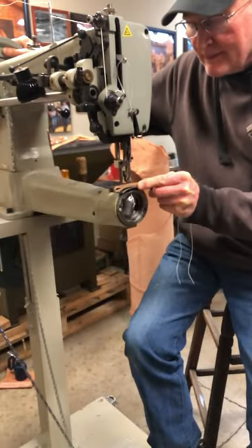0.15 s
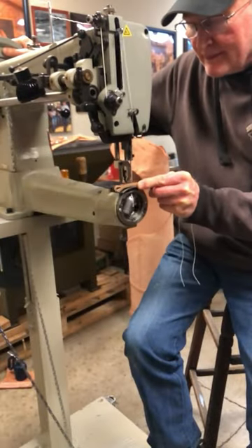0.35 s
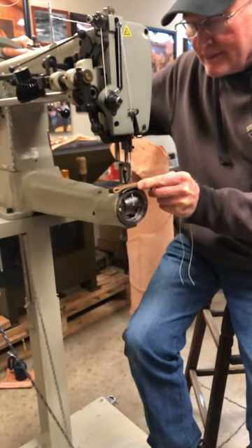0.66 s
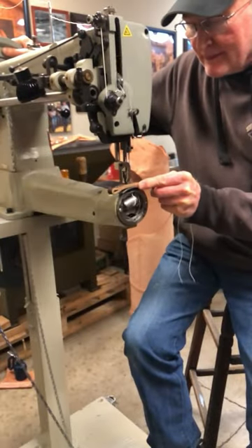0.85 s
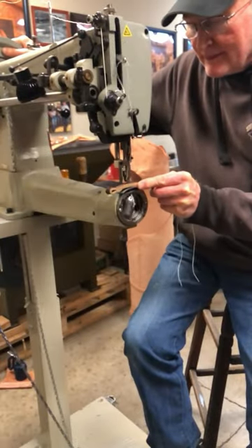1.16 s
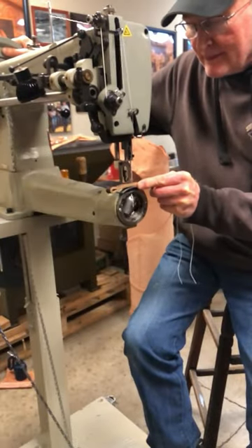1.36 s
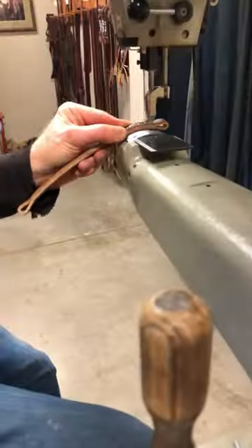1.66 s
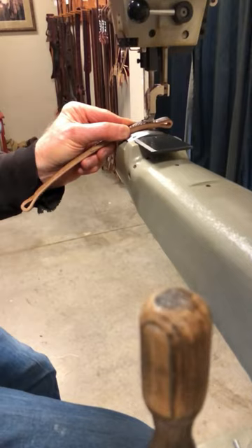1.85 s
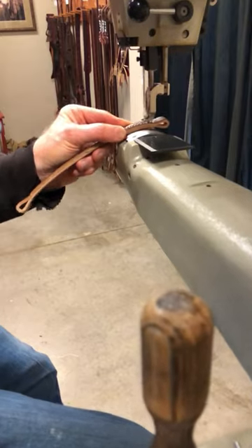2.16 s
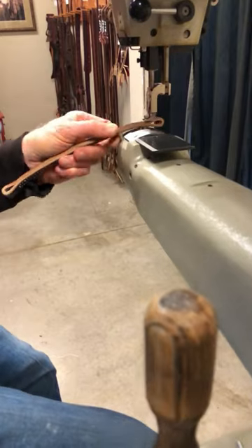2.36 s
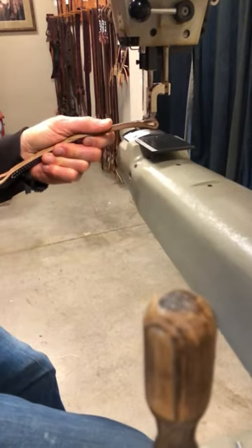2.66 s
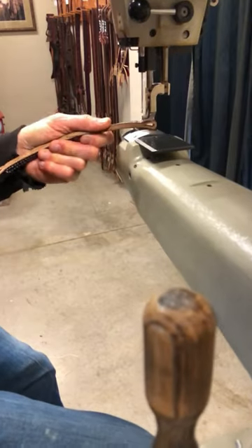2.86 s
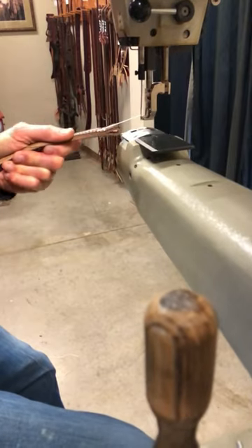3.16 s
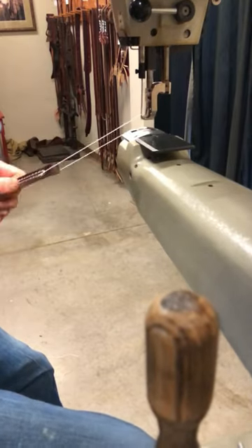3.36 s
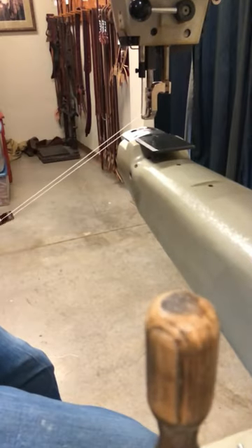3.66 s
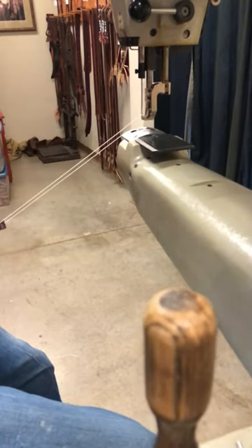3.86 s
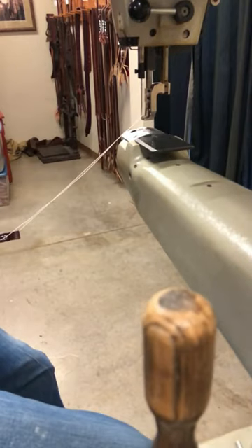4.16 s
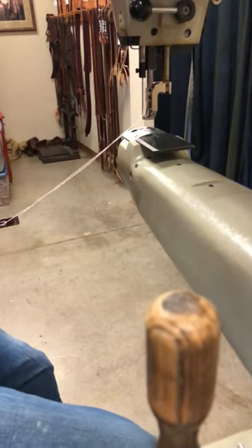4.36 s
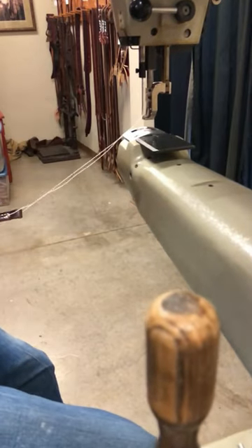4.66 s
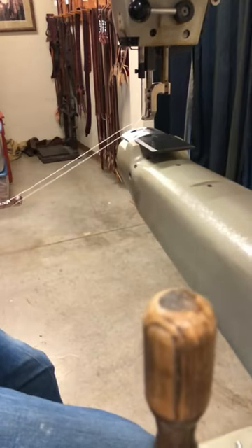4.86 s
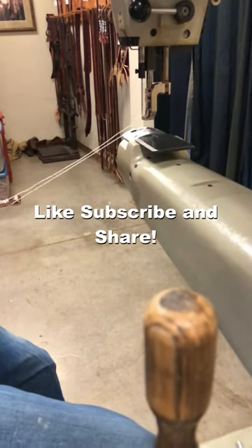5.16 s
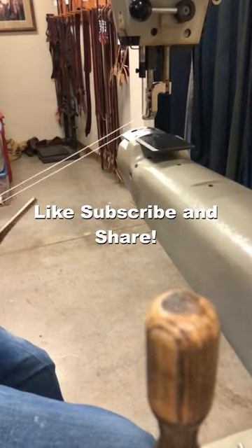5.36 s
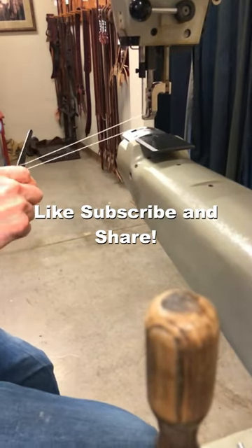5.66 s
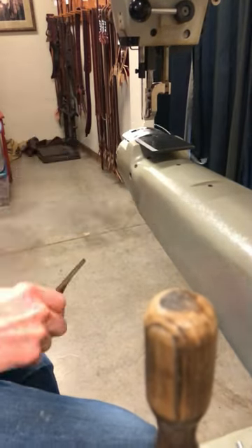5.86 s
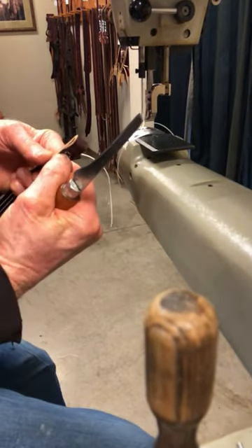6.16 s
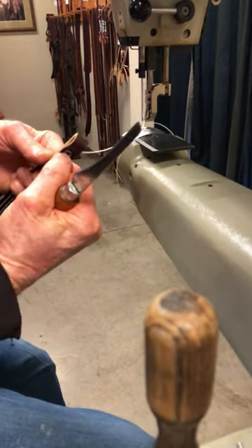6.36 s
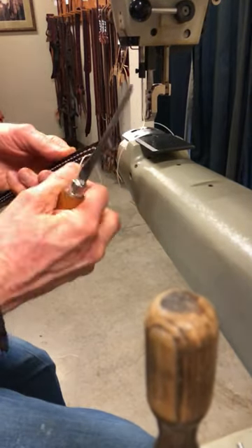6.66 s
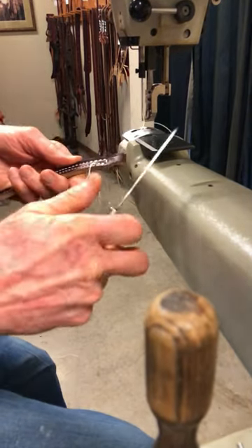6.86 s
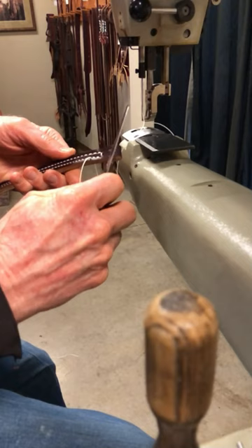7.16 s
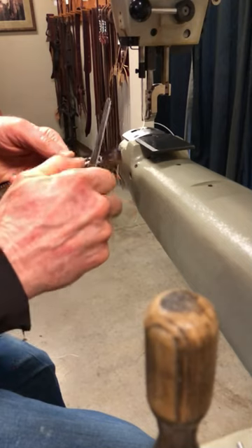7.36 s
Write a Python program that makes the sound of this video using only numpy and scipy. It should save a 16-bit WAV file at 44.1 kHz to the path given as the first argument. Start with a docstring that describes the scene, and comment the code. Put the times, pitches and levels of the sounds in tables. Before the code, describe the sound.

Rapid mechanical clacking and a wavering gear whine cut off abruptly, followed by lever clanks, thread rasp and small knife and leather noises.

```python
"""In a workshop a heavy sewing machine stitches leather three times a second, then stops.
Gear partials whine as load slows them, noise shaped by the frame rumbles, and bursts at each contact clack.
The presser foot is lifted on ringing modes; the work is drawn out, threads rasping by stick and slip in their guides.
Then hands, leather, a knife and a sliding tool knock, squeak and rustle as struck modes, brief tones and grainy noise.
Steady coloured noise is the quiet hum of the shop; both channels are alike."""
import sys
import numpy as np
from scipy import signal
from scipy.fft import rfft, irfft
from scipy.io import wavfile

SR = 44100
rng = np.random.default_rng(int(sys.argv[2]) if len(sys.argv) > 2 else 0)


def magnitude_from_level(level_db):
    """Linear magnitude for a level in decibels (20 dB per decade)."""
    exponent = np.asarray(level_db, float) / 20
    return 10 ** exponent


def wav_record(signal):
    """Record a signal, one row per channel, as 16-bit PCM in the file named by sys.argv[1]."""
    frames = np.transpose(np.atleast_2d(signal))
    bounded = np.clip(frames, -1, 1)
    # unit amplitude maps onto the largest positive 16-bit level
    quanta = np.round(bounded * 32767).astype(np.int16)
    wavfile.write(sys.argv[1], SR, quanta)


N = 331632   # samples

# stitches: (time of first contact [s], level against the usual [dB], load of the leather [0-1])
STITCHES = [(0.0286, -1, 0.54), (0.3620, -1.5, 0.9), (0.6966, 1.5, 0.94), (1.0288, -0.5, 0.4),
            (1.3657, -1, 1.0)]
# load peaks PIERCE_S after the first contact; Gaussian rise, exponential ease; a slow drag grows besides
PIERCE_S, LOAD_RISE_S, LOAD_EASE_S, DRAG_PER_S = 0.1026, 0.0297, 0.07, 0.15
FREE_HZ, LOADED_HZ = 379, 373   # gear mesh rate at load 0 and load 1
# gear whine: (multiple of mesh rate [1], level running free [dB], level with needle in leather [dB])
GEAR_PARTIALS = [(1, -61, -61), (3, -45.5, -48.5), (6, -43.5, -49.5), (7, -43, -42.5), (8, -59.5, -64.5),
                 (9, -47, -38.5), (10, -44.5, -44.5), (11, -50, -47.5), (12, -53, -50.5), (14, -56.5, -47),
                 (15, -69.5, -57), (17, -65.5, -57), (20, -61.5, -59.5)]
# contacts of a stitch: (time into stitch [s], peak [dB], rattle [s], t60 [s], ring [Hz], ring level [dB],
# second ring [Hz], second ring level [dB], thump level [dB])
CONTACTS = [(0, -18.5, 0.0053, 0.013, 6100, -4.5, 3560, -6.5, -6.5),
            (0.1029, -15, 0.001, 0.012, 12700, -1, 3220, -20, -23),
            (0.18, -18.5, 0.0023, 0.0079, 13600, -4.5, 6420, -8.5, -8.5),
            (0.29, -17, 0.0022, 0.048, 10700, -18, 4470, -17.5, -10.5)]
# lighter ticks around contacts: (contact index [1], lag, negative if before [s], level against it [dB], pitch [Hz])
TICKS = [(0, -.006, -10, 9000), (1, -.041, -15, 9000), (2, -.031, -14, 8500), (3, -.004, -11, 8000),
         (3, .007, -7, 4500)]
# spectrum of the machine's rumble: (frequency [Hz], relative density [dB per Hz])
RUMBLE_SPECTRUM = [(25, -36), (45, -8), (70, -6), (180, 0), (309, 2), (778, -4), (1300, -3.5), (1900, -7),
                   (3000, -2.5), (4800, -8.5), (8800, -11), (9800, -15), (13800, -17), (16500, -8)]
# resonances of table and frame: (frequency [Hz], width [Hz], level against the rumble level [dB])
FRAME_MODES = [(126, 36, -13.5), (249, 21, -9), (300, 22, -4), (553, 19, -6)]
# the drive runs until braked at STOP_S, coasts down to SETTLE_DB and is silent after SETTLE_S
RUMBLE_DB, STOP_S, COAST_DB_PER_S, SETTLE_DB, SETTLE_S = -48, 1.523, 305, -61, 1.62
# shaft and motor tones: (frequency [Hz], level [dB])
SHAFT_TONES = [(126.5, -50), (321, -52.5), (237.7, -54.5)]
HUM_FLUTTER_DB, HUM_WANDER_RAD = 5.5, 0.66   # spread of level and phase
# modes of the brake and presser-foot linkage: (frequency [Hz], level [dB], t60 [s])
LIFTER_MODES = [(598, -33, .4), (2670, -32, .16), (1170, -46, .4)]
# blows on that linkage: (time [s], level into first, second, third mode [dB each])
LIFTER_BLOWS = [(1.553, -30, -30, 0), (1.798, 0, -30, -20), (1.841, -30, 0, -20), (1.858, -30, -3, -20)]
SWELL_CYCLES = 24   # a linkage mode takes this long to build up
# knocks of lever, leather and knife: (time [s], level [dB], ring [Hz], thud level [dB], tick level [dB]);
# thud and tick against the knock's level
KNOCKS = [(1.554, -24.5, 1475, -5.5, -7), (1.659, -42, 1290, -15, -15), (1.692, -43, 300, -24, -30),
          (1.754, -40, 3520, -13, -10), (1.774, -42, 3470, -12, -9), (1.807, -41.5, 1170, -3, -8),
          (1.824, -38.5, 1190, -3, 0), (1.841, -27.5, 2810, -35, 8), (1.86, -28.5, 2670, -4, 8.5),
          (1.95, -30.5, 1270, -7, 0.5), (1.967, -38.5, 300, -10, -48), (2.072, -25, 1200, -18, -13.5),
          (2.092, -41.5, 286, -7, -40), (2.126, -32, 1230, -26, -28), (2.158, -51, 9000, -20, 0),
          (2.174, -49.5, 800, -10, -10), (2.232, -40, 1190, -12, -14), (2.241, -41, 2140, 0, -33),
          (2.364, -37, 1410, -4.5, -23), (2.394, -47.5, 2340, -3.5, 4), (2.534, -53.5, 2110, 0.5, -9),
          (2.583, -50, 3200, -24.5, -1), (2.616, -50, 1770, 4.5, -7.5), (2.659, -46, 3960, -8, -18),
          (2.781, -50, 2240, 0, -24), (2.828, -49, 1120, 3, 3), (2.936, -45, 896, 0, -25),
          (3.021, -40, 2160, 0.5, -33), (3.116, -51, 1120, 3.5, -17), (3.166, -49, 1180, -11, 7.5),
          (3.208, -43, 2180, -12, -30), (3.245, -43.5, 1690, -5, -27), (3.336, -36, 2090, -8.5, -11),
          (3.378, -37, 1190, -4.5, -10), (3.427, -35, 2030, -12, -16), (3.504, -34, 2110, -10.5, -14),
          (3.604, -48, 1840, -11, -12), (3.933, -52.5, 980, -6, -27), (3.983, -38.5, 3560, -13, 4),
          (3.987, -40, 1880, -16, -14), (4.142, -50, 230, -12, -43), (4.381, -57, 4340, -11.5, 0),
          (4.498, -59, 988, -5, -14), (4.592, -48.5, 4850, -0.5, 0), (4.682, -51, 1580, -0.5, -7),
          (4.732, -32, 990, -29, 4), (4.786, -51, 1040, -6, -12), (4.843, -40, 9300, -10, -24),
          (4.882, -38.5, 11100, -19, -16), (4.924, -45.5, 1470, -7, -16), (5.088, -50, 4060, -27, -16),
          (5.309, -54, 920, -5, -8), (5.472, -54, 1570, -15, -8), (5.78, -46, 6100, -10, -5),
          (5.798, -37.5, 7940, 1, 8), (5.806, -34.5, 2030, -0.5, 2), (6.31, -49, 1160, -7, 8.5),
          (6.349, -61, 4500, -15, -9), (6.372, -56, 1070, -2.5, 3), (6.404, -61, 4800, -10, 3),
          (6.492, -58, 890, -4, 0), (6.583, -43.5, 11400, -24, 14), (6.626, -53, 7060, -19, -11),
          (6.977, -34, 6400, -26.5, 6.5), (7.047, -40, 3970, -24, -5), (7.233, -56.5, 5500, -12, 9),
          (7.37, -67.5, 1344, -9, 13)]
# metal parts that every knock stirs: (frequency [Hz], width [Hz])
METAL_PARTS = [(870, 57), (1195, 190), (1400, 180), (1750, 190), (2150, 13), (2470, 17), (3060, 120),
               (3500, 25), (4100, 400), (5240, 220), (5900, 31), (8200, 72), (11000, 1500)]
# base 60 dB decay of a knock ringing at 1 kHz, scaled for each part; exponent by which it shortens with pitch
KNOCK_DECAY_S, DECAY_EXPONENT = 0.1, 0.28
# strokes of thread drawn through the guides, each: (time [s], level [dB])
THREAD_STROKES = [
    [(3.15, -69), (3.19, -53.5), (3.28, -57), (3.33, -52.5), (3.45, -50.5), (3.55, -52.5), (3.61, -57.5),
     (3.63, -56)],
    [(3.7, -72), (3.72, -61), (3.78, -57), (3.84, -58), (3.855, -58)],
]
# resonances of the guides: (frequency [Hz], width [Hz], relative level [dB])
GUIDE_MODES = [(445, 31, 18.5), (806, 180, 11), (1190, 120, 13.5), (1410, 54, 14), (1704, 110, 13.5),
               (2170, 17, 16.5), (3570, 100, 3.5), (5160, 58, -3)]
# slide of a metal tool across the table: (time [s], level [dB])
TOOL_STROKE = [(4.67, -88), (4.69, -62.5), (4.74, -65), (4.8, -57), (4.85, -65), (4.93, -62), (5.03, -75),
               (5.06, -105)]
# resonances of the tool: (frequency [Hz], width [Hz], relative level [dB])
TOOL_MODES = [(800, 27, -11), (994, 60, -1.5), (1740, 88, -11), (1830, 21, 4), (3620, 220, -9.5),
              (5840, 310, -10), (8100, 150, -16)]
# squeaks of thread and leather: (time of peak [s], peak [dB], pitch [Hz], half length [s])
SQUEAKS = [(3.596, -44.5, 2120, 0.0045), (3.606, -43.5, 1880, 0.0057), (3.724, -51.5, 2180, 0.0087),
           (3.765, -52, 2170, 0.0056), (4.149, -53, 2130, .004), (4.157, -41.5, 1930, 0.004),
           (4.158, -52, 2870, 0.0045), (4.79, -48.5, 1620, 0.0052)]
SQUEAK_SAG, SQUEAK_ROUGH = 0.02, 0.24   # share of pitch lost per half length; share of noise in the level
# rubs of hands on leather and cloth: (time of peak [s], time to fall 10 dB, at least 0.005 [s], level [dB],
# centre above 500 Hz [octaves], loss away from it [dB per octave])
RUBS = [(1.62, 0.28, -55, 0.5, 23), (1.77, 0.17, -55.5, 0.5, 10), (1.861, 0.0584, -39, 2, 8),
        (2.15, 0.08, -56, 0.5, 4), (2.33, 0.11, -55, 0.5, 8.5), (2.41, 0.07, -64, 5, 8),
        (2.59, -0.28, -68, 7, 0), (2.72, -0.22, -59, 3, 9), (2.8, -0.29, -57, 0, 4),
        (2.91, 0.08, -60, 0.4, 9), (3.27, 0.08, -52.5, -2, 5.5), (3.49, 0.1143, -51.5, -0.5, 4),
        (3.59, 0.3, -62, 1, 12), (3.8, -0.01, -50, -1.5, 5), (4.45, 0.05, -71.5, 4.5, 6),
        (4.76, -0.09, -59, 0, 2), (4.86, 0.05, -54, 5, 9), (5.11, 0.1457, -70, 7, 0.5),
        (5.22, 0.05, -61.5, 2, 5), (5.46, 0.11, -65, -1.5, 1.5), (6.38, -0.17, -69.5, .5, 3),
        (6.509, .03, -62, 0.8, 7), (6.66, 0.18, -74.5, 4.5, 4), (6.92, 0.37, -79, 5.5, 6),
        (7.21, -0.3, -73, -0.5, 0), (7.37, -0.02, -73.5, 5, 4)]
# shudders that a blow sets off at once: same columns as RUBS
JOLTS = [(1.556, 0.0453, -41.5, 2, 5.5), (1.951, 0.09, -41.5, 0.55, 8.5), (2.365, 0.14, -59.5, 0.5, 6.5),
         (3.023, 0.12, -56.5, 0, 5), (3.985, .05, -52, 1.54, 4), (4.141, 0.12, -57, 0.75, 5.5),
         (4.589, 0.09, -63, 3, 5.5), (5.801, 0.0449, -55, 0, 1.5), (6.312, -0.02, -65, -2, 2),
         (6.98, 0.14, -68, 3.1, 11), (7.049, 0.23, -74, 5, 14)]
RUB_RISE_SHARE, JOLT_RISE_SHARE = 0.63, 0.03   # time to rise 10 dB, as a share of the fall time
# faint rustle between rubs: (time [s], level at 500 Hz [dB])
HANDLING = [(1.56, -71), (2.5, -71.5), (3.4, -68.5), (4.4, -73), (5.6, -75), (5.899, -78.5), (6.8, -78.5),
            (7.52, -79)]
HANDLING_TILT_DB = -3   # per octave
# spectrum of the shop: (frequency [Hz], relative density [dB per Hz])
SHOP_SPECTRUM = [(25, -26), (45, -10), (70, -4), (105, 1.5), (160, -5), (295, -12.5), (486, -15.5),
                 (700, -26), (1220, -27.5), (2200, -33), (5600, -33), (12000, -37.5), (16500, -37.5)]
# level of the shop: (time [s], level [dB])
SHOP_LEVEL = [(1.6, -62.5), (2.05, -59.5), (2.75, -64.5), (5.69, -63), (7.52, -66)]
ROOM_T60_S, ROOM_DB = 0.16, -18.5


def rms_one(x):
    """Normalization by power: scale to rms 1."""
    return x / np.sqrt(np.mean(x ** 2) + 1e-20)


def peak_one(x):
    """Normalization by amplitude: scale to peak 1."""
    return x / np.abs(x).max()


def level_curve(rows):
    """Linear interpolation of a (time, level) table in dB; end values are held."""
    s, db = np.transpose(rows)
    return np.interp(np.arange(N) / SR, s, db)


def span(rows, fade_s=0.0037):
    """Gating: 1 while a table lasts, fading to 0 at its ends."""
    t = np.arange(N) / SR
    return np.clip(np.minimum(t - rows[0][0], rows[-1][0] - t) / fade_s + .5, 0, 1)


def drift(rate_hz):
    """Slow random modulation: chance values at a given rate, joined by straight lines."""
    knots = rng.standard_normal(400)
    return np.interp(np.arange(N) / SR * rate_hz, np.arange(400), knots) * 1.22


def band(x, low_hz, high_hz):
    """Band-pass filtering."""
    edges_hz = [low_hz, min(high_hz, .45 * SR)]
    return signal.sosfilt(signal.butter(2, edges_hz, "band", fs=SR, output="sos"), x)


def resonance(x, hz, width_hz):
    """A damped oscillator: two poles, gain about 1 at the top."""
    r = np.exp(-np.pi * width_hz / SR)
    zeros = np.array([1, 0, -1]) * (1 - r * r) / 2
    poles = [1, -2 * r * np.cos(2 * np.pi * hz / SR), r * r]
    return signal.lfilter(zeros, poles, x)


def coloured(spectrum):
    """Spectral shaping of white noise, interpolated over log frequency; rms 1."""
    hz, db = np.transpose(spectrum)
    grid_hz = np.maximum(np.arange(N // 2 + 1) * SR / N, 1)
    gain = magnitude_from_level(np.interp(np.log(grid_hz), np.log(hz), db))
    return rms_one(irfft(rfft(rng.standard_normal(N)) * gain, N))


def grains(spread_db, size=N):
    """Many tiny contacts: noise whose samples are now and then much larger; rms 1."""
    boost_db = spread_db * np.minimum(rng.exponential(1, size), 4)
    return rms_one(rng.standard_normal(size) * magnitude_from_level(boost_db))


def add(out, s, sound):
    """Superposition: mix a sound in at a time."""
    at = round(s * SR)
    out[at:at + len(sound)] += sound[:N - at]


def scrape(strokes, modes, broad, jerk_db):
    """Stick-slip friction: jerky grains excite a body whose resonances come and go on their own."""
    rasp = grains(6.3) * magnitude_from_level(jerk_db * drift(45))
    body = broad * band(rasp, 300, 4500)
    for hz, width_hz, db in modes:
        body += magnitude_from_level(db + 3.0 * drift(25)) * resonance(rasp, hz, width_hz)
    level = sum(span(stroke) * magnitude_from_level(level_curve(stroke)) for stroke in strokes)
    return rms_one(body) * level


def mesh_rate():
    """Loading of a drive: each piercing of the leather slows the gears, which then catch up."""
    t = np.arange(N) / SR
    load = DRAG_PER_S * t
    for s, _, depth in STITCHES:
        lag = t - s - PIERCE_S
        rise, ease = np.exp(-(lag / LOAD_RISE_S) ** 2), np.exp(-np.abs(lag) / LOAD_EASE_S)
        load = load + depth * np.where(lag < 0, rise, ease)
    return FREE_HZ - (FREE_HZ - LOADED_HZ) * load


def whine(mesh_hz):
    """Harmonic excitation: gear teeth sing on multiples of the mesh rate, and load reweights the partials."""
    load = np.clip((FREE_HZ - mesh_hz) / (FREE_HZ - LOADED_HZ), 0, 1)
    phase, out = 2 * np.pi * np.cumsum(mesh_hz) / SR, 0
    for multiple, free_db, loaded_db in GEAR_PARTIALS:
        flutter_db = 2.5 * drift(35)   # uneven teeth make each partial flutter
        level = magnitude_from_level(free_db + load * (loaded_db - free_db) + flutter_db)
        out = out + level * np.sin(round(multiple) * phase + 0.64 * drift(60.0))
    return out


def clacks():
    """Impact: each contact cracks, rattles for milliseconds, then decays, with two rings and a thump of the frame."""
    out, t = np.zeros(N), np.arange(4000) / SR
    for start_s, stitch_db, _ in STITCHES:
        for k, (into_s, peak_db, rattle_s, t60, hz, ring_db, hz2, ring2_db, thump_db) in enumerate(CONTACTS):
            s, db = start_s + into_s, peak_db + stitch_db + rng.normal(0, 1)
            if s > STOP_S:
                break
            burst = grains(4.7, size=len(t)) * magnitude_from_level(-60 * np.maximum(t - rattle_s, 0) / t60)
            burst *= 1 + 1.14 * np.exp(-t / 0.0005)   # sharper onset
            sound = peak_one(band(burst, 2800, 13600))
            sound += magnitude_from_level(ring_db) * peak_one(resonance(burst, hz, 0.12 * hz))
            sound += magnitude_from_level(ring2_db) * peak_one(resonance(burst, hz2, 0.025 * hz2))
            sound += magnitude_from_level(thump_db) * peak_one(band(burst, 330, 1880))
            add(out, s, magnitude_from_level(db) * peak_one(sound))
            for contact, lag_s, tick_db, tick_hz in TICKS:
                if contact == k:
                    tick = grains(3.5, size=len(t)) * magnitude_from_level(-60 * t / 0.015)
                    tick = band(tick, .5 * tick_hz, 1.4 * tick_hz)
                    add(out, s + lag_s, magnitude_from_level(db + tick_db) * peak_one(tick))
    return out


def rumble(level_db):
    """Broadband excitation: bearings, belt and cams make noise, and noise rings in the frame."""
    out = magnitude_from_level(10.5 + 1.2 * drift(24)) * coloured(RUMBLE_SPECTRUM)
    for hz, width_hz, db in FRAME_MODES:
        out += magnitude_from_level(db) * rms_one(resonance(rng.standard_normal(N), hz, width_hz))
    return magnitude_from_level(level_db) * out


def hum():
    """Periodic rotation: shaft and motor sing low tones that waver in level and phase."""
    t, out = np.arange(N) / SR, 0
    for hz, db in SHAFT_TONES:
        level = magnitude_from_level(db + HUM_FLUTTER_DB * drift(9.1))
        out = out + level * np.sin(2 * np.pi * hz * t + HUM_WANDER_RAD * drift(12))
    return out


def lifter():
    """Modal ringing: the linkage of brake and presser-foot lever sounds its modes at every blow."""
    out, t = np.zeros(N), np.arange(SR // 2) / SR
    for s, *blow_db in LIFTER_BLOWS:
        for (hz, db, t60), into_db in zip(LIFTER_MODES, blow_db):
            swell = np.minimum(t * hz / SWELL_CYCLES, 1)
            add(out, s, magnitude_from_level(into_db + db - 60 * t / t60) * np.sin(2 * np.pi * hz * t) * swell)
    return out


def knocks():
    """Modal excitation: a blow rings, stirs the metal nearest in pitch, opens with a tick and ends in a longer thud."""
    out, t = np.zeros(N), np.arange(10000) / SR
    for s, db, hz, thud_db, tick_db in KNOCKS:
        decay_s = KNOCK_DECAY_S * (hz / 1000) ** -DECAY_EXPONENT
        noise, fall_db = grains(1.9, size=len(t)), -60 * t / max(decay_s, .005)
        # fast and slow decays together
        blow = noise * (magnitude_from_level(2.3 * fall_db) + 0.11 * magnitude_from_level(fall_db))
        crack = noise * (magnitude_from_level(16.0 * fall_db) + 0.097 * magnitude_from_level(fall_db))
        ring = np.sin(2 * np.pi * hz * t) * magnitude_from_level((1.5 + hz / 4000) * fall_db) * np.minimum(t / .0015, 1)
        clatter = 0.61 * band(blow, 0.93 * hz, 2.45 * hz)
        for part_hz, width_hz in METAL_PARTS:
            octaves = np.log2(part_hz / hz)
            loss_db = (8.0 if octaves > 0 else 16.0) * abs(octaves)
            clatter += magnitude_from_level(-loss_db) * resonance(blow, part_hz, width_hz)
        sound = .6 * ring + .7 * peak_one(clatter)
        thud = band(noise * magnitude_from_level(.55 * fall_db), 220, 1000)
        sound += magnitude_from_level(thud_db) * peak_one(thud + 0.38 * resonance(thud, 270, 28))
        tick = band(band(crack, 2000, 19000), 1600, 8400 + hz)   # its top rises with the ring
        sound += magnitude_from_level(tick_db) * peak_one(tick)
        add(out, s, magnitude_from_level(db) * sound)
    return out


def thread():
    """Stick-slip friction: twisted thread rasps over the guides and tension discs."""
    return scrape(THREAD_STROKES, GUIDE_MODES, broad=0.027, jerk_db=1.8)


def tool():
    """Stick-slip friction: a metal tool slides over the table and rings on its resonances."""
    return scrape([TOOL_STROKE], TOOL_MODES, broad=0.16, jerk_db=4.0)


def squeaks():
    """Self-excited slip: a rough tone of thread or leather under a bell-shaped swell, sagging in pitch."""
    t, out = np.arange(N) / SR, 0
    for s, db, hz, half_s in SQUEAKS:
        lag = np.clip((t - s) / half_s, -5, 5)
        phase = 2 * np.pi * hz * half_s * (lag - SQUEAK_SAG * lag ** 2 / 2)
        out = out + magnitude_from_level(db) * np.exp(-lag ** 2) * np.sin(phase)
    return out * (1 + SQUEAK_ROUGH * rms_one(band(rng.standard_normal(N), 60, 360)))


def rustle():
    """Granular friction: rubs in four ranges flicker together, swell and fade, strongest near their centres."""
    out, t, edges_hz = 0, np.arange(N) / SR, [220, 1000, 3500, 8000, 15000]
    coarse_t = t[::64]   # envelopes are computed at every 64th sample
    s, fall_s, db, centre, loss_db = np.transpose(RUBS + JOLTS)
    rise_share = np.repeat([RUB_RISE_SHARE, JOLT_RISE_SHARE], [len(RUBS), len(JOLTS)])
    lag = (coarse_t[:, None] - s) / np.maximum(fall_s, .005)
    swell_db = db - 10 * np.where(lag < 0, -lag / rise_share, lag)
    for low_hz, high_hz in zip(edges_hz, edges_hz[1:]):
        octave = np.log2(np.sqrt(low_hz * high_hz) / 500)
        each_rub = magnitude_from_level(swell_db - loss_db * abs(octave - centre))
        rubs = np.interp(t, coarse_t, each_rub.sum(axis=1))
        handling = magnitude_from_level(level_curve(HANDLING) + HANDLING_TILT_DB * octave)
        out = out + np.hypot(rubs, handling) * rms_one(band(grains(3.4), low_hz, high_hz))
    return out * magnitude_from_level(1.94 * drift(30)) * span(HANDLING)


def shop():
    """Stationary noise of fixed spectrum: the quiet hum of the shop, its level slowly varying."""
    return magnitude_from_level(level_curve(SHOP_LEVEL)) * coloured(SHOP_SPECTRUM)


def room(x):
    """Diffuse reverberation: convolution with band-limited noise that starts after 6 ms and dies exponentially."""
    t = np.arange(int(.6 * SR)) / SR
    tail = band(rng.standard_normal(len(t)), 150, 16000) * magnitude_from_level(-60 * t / ROOM_T60_S) * (t > .006)
    return signal.fftconvolve(x, magnitude_from_level(ROOM_DB) * tail / np.sqrt(np.sum(tail ** 2)))[:N]


def scene():
    """Superposition of machine and work with their reflections, rustle and shop, alike in both channels."""
    t = np.arange(N) / SR
    rumble_db = np.maximum(RUMBLE_DB - COAST_DB_PER_S * np.maximum(t - STOP_S, 0), SETTLE_DB)
    turning = np.clip((1.545 - t) / 0.02, 0, 1)
    shaking = np.clip((SETTLE_S - t) / 0.069, 0, 1)
    machine = turning * (whine(mesh_rate()) + hum()) + shaking * rumble(rumble_db) + clacks()
    near = machine + knocks() + lifter() + squeaks() + thread() + tool()
    return np.tile(near + room(near) + rustle() + shop(), (2, 1))


def top_cut(x):
    """Nothing passes above the cut-off."""
    return signal.sosfilt(signal.butter(12, 16820, fs=SR, output="sos"), x)


def record(dry):
    """Band limiting: a steep elliptic low-pass removes the top of the spectrum."""
    low_pass = signal.ellip(8, .5, 45, 15750, fs=SR, output="sos")
    mix = signal.sosfilt(low_pass, dry)
    return top_cut(mix)


dry = scene()
out = record(dry)
wav_record(out)
```